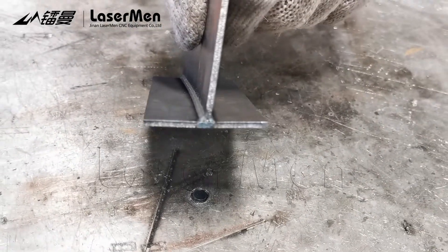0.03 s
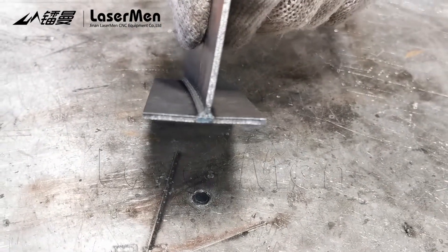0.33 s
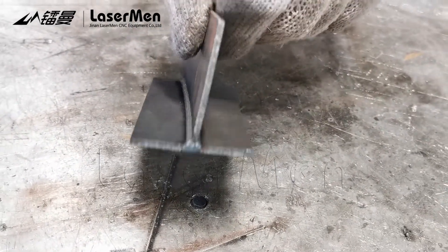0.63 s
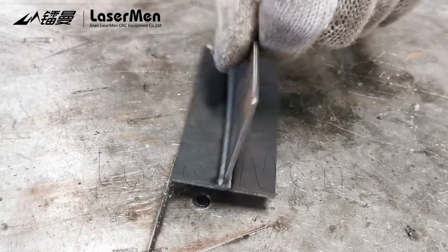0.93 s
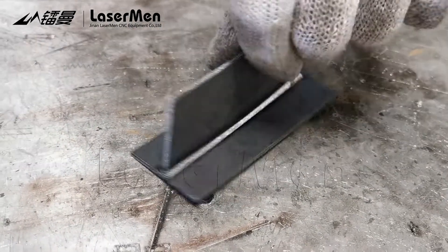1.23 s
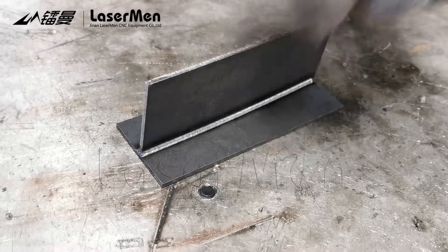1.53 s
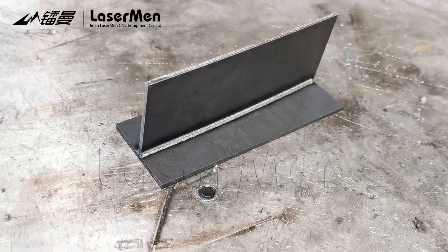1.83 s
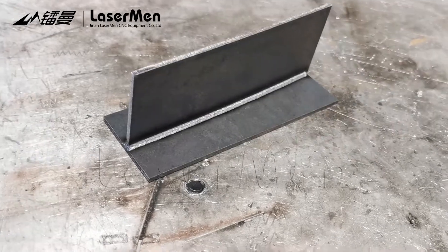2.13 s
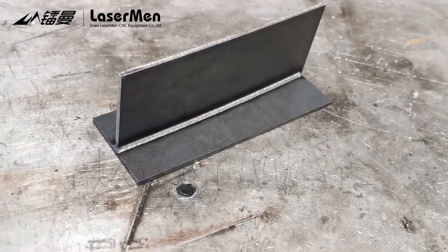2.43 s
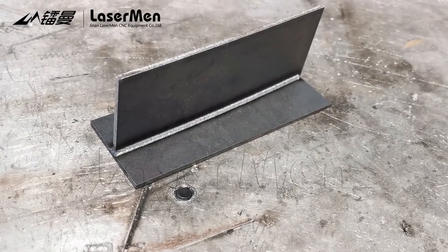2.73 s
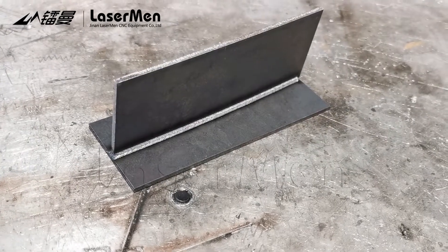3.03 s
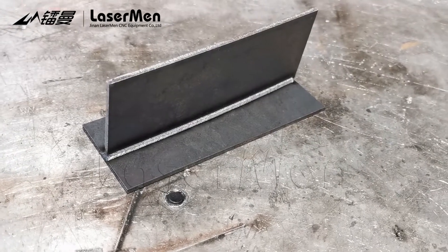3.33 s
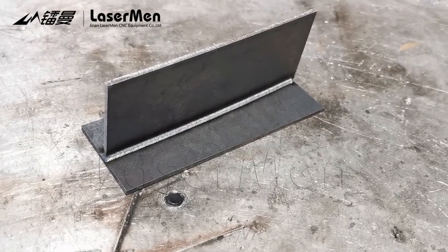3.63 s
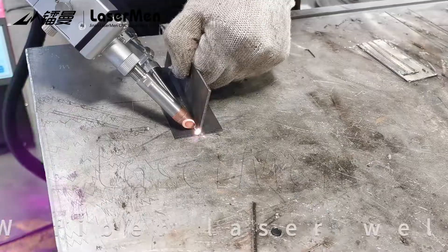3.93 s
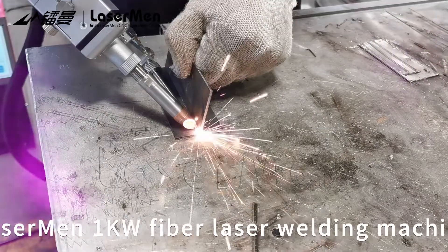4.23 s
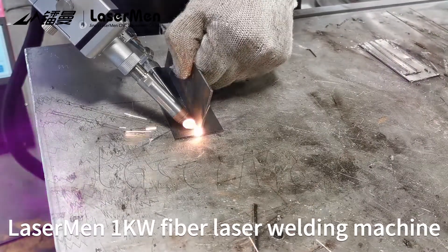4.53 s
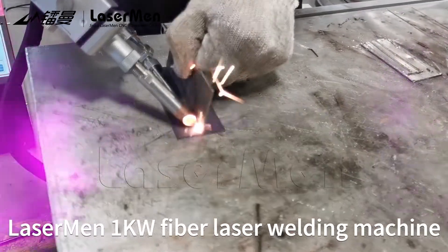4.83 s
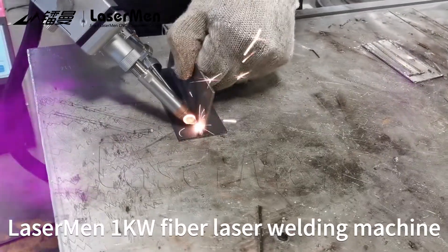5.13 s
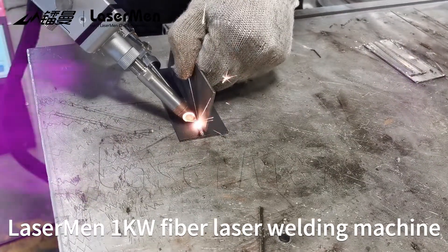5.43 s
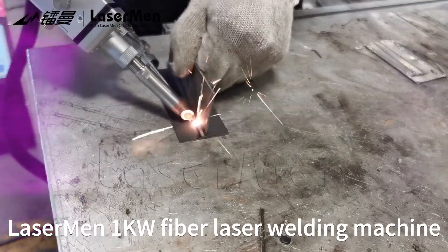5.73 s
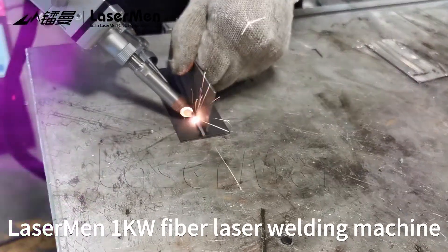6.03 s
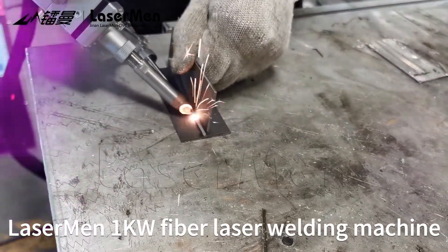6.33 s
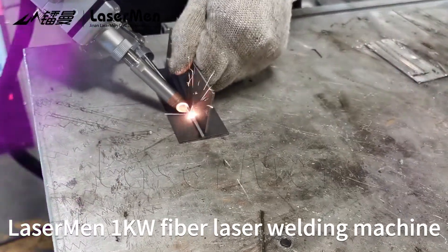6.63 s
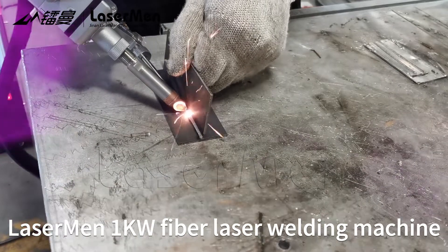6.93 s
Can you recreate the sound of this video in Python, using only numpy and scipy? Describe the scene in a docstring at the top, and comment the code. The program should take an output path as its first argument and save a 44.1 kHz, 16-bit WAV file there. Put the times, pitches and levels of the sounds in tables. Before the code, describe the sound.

In a workshop, over the steady hum of fans and pumps, a steel piece is set down on a metal table with light knocks and a bright scrape. A short clink comes just before a moment of silence. Then a handheld laser welding gun starts with a puff of gas and settles into a close, bright, rapidly pulsing sizzle, mostly on the left, with popping droplets and growing sputter over a low machine hum.

```python
"""Laser welding in a workshop

Fans drone while a steel T-piece is turned and set down on a steel table: its edges ring and skid, the
table top clacks, and a loose part clinks. After a short silence a handheld laser gun starts. Shield gas
rushes from the nozzle, then the melt pool sizzles close on the left, spitting sparks and fluttering
as the beam sweeps from side to side across the seam."""
import sys
import numpy as np
from scipy import signal
from scipy.fft import rfft, irfft
from scipy.io import wavfile
from scipy.ndimage import uniform_filter1d

SR = 44100
rng = np.random.default_rng(int(sys.argv[2]) if len(sys.argv) > 2 else 0)


def wrap_up_sound(samples):
    """Save the sound to the file named by the first command line argument, as 16-bit audio."""
    columns = np.atleast_2d(samples).T
    # keep every value between -1 and 1, then stretch to whole-number steps
    tamed = np.clip(columns, -1, 1)
    steps = np.round(tamed * 32767).astype(np.int16)
    wavfile.write(sys.argv[1], SR, steps)


N = 308700
T = np.arange(N) / SR
FREQS = np.maximum(np.arange(N // 2 + 1) * SR / N, 1)

# bed of workshop fan noise: f/Hz, left level/dB, right level/dB
FAN_SPECTRUM = [(25, -88, -80.5), (50, -76, -68), (115, -72.5, -68), (209.5, -65, -60), (303, -72.5, -66),
                (446, -81, -78), (680, -79.5, -75), (860, -79, -74.5), (1530, -86.5, -79.5),
                (3355, -90.5, -73), (4360, -91, -89.5), (6750, -101, -88.5), (8460, -101, -100),
                (15460, -106, -117)]
# fan and pump tones: f/Hz, level/dB
FAN_TONES = [(113, -52), (178, -58), (199, -54), (224, -56.5), (301.5, -55), (341, -56), (663, -62.5),
             (690, -65.5), (769, -69.5), (905, -66), (922, -63), (1012, -67), (1092, -73.5), (1249, -66.5),
             (1376, -69.5), (1615, -75.5), (3085, -69), (3511, -64.5), (3698, -67.5), (3747, -69),
             (3795, -70.5)]
# partials of a motor whine: f/Hz, level/dB
MOTOR_WHINE = [(948, -55), (958.5, -57.5), (996, -60)]
# machine noise at the welding bench: f/Hz, left level/dB, right level/dB
MACHINE_SPECTRUM = [(25, -92, -99), (60, -80, -95), (121, -76.5, -86.5), (267, -78, -83.5),
                    (332, -83, -90.5), (446, -85.5, -101.5), (790, -86.5, -94), (990, -92.5, -99),
                    (1190, -87.5, -98.5), (1680, -93.5, -99.5), (2900, -91, -97)]
# hum of that machine: f/Hz, level/dB
MACHINE_TONES = [(221, -71.5), (904, -78.5), (953, -71), (1001, -74)]

# modes of the T-piece: f/Hz, level/dB, t60/s
PIECE_MODES = [(5640, -7, .17), (5820, 1, 0.14), (5980, -8, .14), (6400, -8.5, .26), (6540, -11, .2),
               (7650, -11.5, 0.224), (7800, -16, .1), (8400, -12.5, .14), (10580, -10, .16),
               (10900, -9.5, .17), (14120, -14.5, .16)]
# modes of the table top: f/Hz, level/dB, t60/s
TABLE_MODES = [(230, -12, 0.12), (318, -10, 0.19), (590, -5, 0.16), (723, -8, .08), (850, -1.5, 0.14),
               (962, -11, 0.18), (1059, -1, 0.11), (1140, -7, .05), (1460, -13, .06), (1740, -17, .08),
               (1860, -0.5, 0.092), (2060, -5.5, .05), (2280, -7, 0.055), (2810, -7, 0.083)]
# modes of a loose steel part: f/Hz, level/dB, t60/s
LOOSE_MODES = [(2830, -2.5, 0.017), (3170, -8, 0.026), (3440, -2, 0.043), (3700, -10, 0.069),
               (5300, -8, 0.027), (5100, -4, 0.027), (6980, -9.5, 0.036), (7640, -11, .03),
               (8890, -19, 0.034)]
# an edge of the piece grazes the table: t/s, ring level/dB, skid level/dB
EDGE_TOUCHES = [(1.1486, -52, -45), (1.168, -51, -46), (1.24, -54, -49), (1.319, -53, -46),
                (1.346, -53, -40), (1.377, -53, -37), (1.403, -45, -19.5)]
# a corner catches: t/s, level/dB, f/Hz
CORNER_TICKS = [(1.1486, -27.5, 6950), (1.163, -34, 6900)]
# the piece knocks on the table, corner first, flat at last: t/s, ring level/dB, clack level/dB, f/Hz
TABLE_KNOCKS = [(1.1486, -48, -41, 2200), (1.170, -47, -27, 2700), (1.4228, -38.5, -28, 1200)]
# the loose part clinks: t/s, ring level/dB, scrape level/dB
LOOSE_CLINKS = [(3.702, -32.5, -35), (3.708, -33, -37), (3.716, -33.5, -33.5), (3.718, -37.5, -36.5)]

# resonances of the gas jet in nozzle and joint: f/Hz, nominal width/Hz, left level/dB, right level/dB
JET_RESONANCES = [(957, 130, -75, -71.5), (2150, 196, -68.5, -69), (3500, 700, -78.5, -74),
                  (5290, 520, -67, -75), (6820, 250, -66, -69), (8330, 620, -73, -85),
                  (11100, 1100, -77, -91), (13000, 900, -73.5, -94), (14300, 600, -69, -101)]
# hollow body of the first rush of gas: f/Hz, nominal width/Hz, level/dB
PUFF_RESONANCES = [(170, 146, -67.5), (357, 88, -65.5)]
# droplets burst out of the pool: t/s, level/dB, f/Hz
SPATTER_POPS = [(4.26, -32, 3000), (4.666, -46, 2350), (4.794, -43, 2310), (5.106, -32, 3000),
                (5.398, -42, 2930), (5.997, -39, 2500), (6.008, -34.5, 1800), (6.043, -42, 2000),
                (6.797, -38, 2300), (6.89, -38, 2500), (6.958, -34, 2500), (6.983, -29, 7000)]
# colour of the sizzle on the near, left side: f/Hz, level/dB
NEAR_SIZZLE = [(1500, -102), (2400, -92), (3500, -84), (4500, -80.5), (5200, -79), (5700, -81.5),
               (6400, -78.5), (8000, -77.5), (9400, -68), (10700, -67), (12400, -74.5), (13100, -67),
               (14500, -68.5), (15700, -73)]
# colour of the sizzle on the far, right side: f/Hz, level/dB
FAR_SIZZLE = [(2900, -105), (3850, -88), (5000, -89), (6000, -99), (6750, -88), (7500, -101), (8100, -90.5),
              (9100, -104), (10100, -105), (10600, -91.5), (12300, -95.5), (15000, -111)]
# reflections in the corner of the joint cancel the sizzle: f/Hz, nominal half width/Hz, gain/dB
JOINT_NOTCHES = [(3990, 186, -17), (7080, 320, -6.5), (8520, 430, -4), (10030, 250, -14.5),
                 (11610, 240, -14), (14200, 150, -3)]
# the plume rings in that corner: f/Hz, nominal width/Hz, level/dB
JOINT_RESONANCES = [(5160, 460, -92), (6730, 420, -72), (8000, 360, -76)]
# vapour spurts from plates and seam on each swing of the beam: position/cycles, width/cycles, level/dB
SWING_SPURTS = [(.19, 0.14, 2), (.435, 0.062, -1.5), (.555, .024, -2.5), (.63, .055, -10),
                (.93, 0.072, 1.5)]

SILENCE_START_S, SILENCE_END_S = 3.736, 3.964
STRIKE_S, DUCK_S = 4.078, 4.1  # the beam strikes; machine and gas duck as the weld takes hold


def undb(db):
    """Decibels to gain."""
    return 10 ** (np.asarray(db) / 20)


def ramp(start_s, length_s):
    """Linear fade from 0 to 1."""
    return np.clip((T - start_s) / length_s, 0, 1)


def after(s):
    """Seconds gone by since time s."""
    return np.maximum(T - s, 0)


def white():
    """White noise of 0 dB per Hz."""
    return rng.standard_normal(N) * np.sqrt(SR / 2)


def walk(rate_hz):
    """Smooth random modulator: stepped levels, slewed twice; spread near 1."""
    hold = max(int(SR / rate_hz), 1)
    steps = np.repeat(rng.standard_normal(N // hold + 1), hold)
    return 1.295 * uniform_filter1d(uniform_filter1d(steps, hold), hold)[:N]


def colours(spectrum):
    """An EQ curve, as gain per frequency, for each level column of a spectrum."""
    hz, *columns = np.transpose(spectrum)
    return np.array([undb(np.interp(np.log(FREQS), np.log(hz), db)) for db in columns])


def resonance(hz, width_hz):
    """Response of one resonance, gain 1 at its centre."""
    return 1 / (1 + 1j * (FREQS / hz - hz / FREQS) * hz / width_hz)


def cavity(resonances):
    """Response of a hollow: steep-sided resonances in parallel."""
    return sum(undb(db) * resonance(hz, width) ** 2 for hz, width, db in resonances)


def shaped(x, response):
    """Filter a sound by a frequency response."""
    return irfft(rfft(x) * response, N)


def bandpass(x, hz, q):
    """Resonant band-pass for short sounds."""
    return signal.lfilter(*signal.iirpeak(hz, q, fs=SR), x)


def add(track, s, sound):
    """Mix a short sound into a track at time s."""
    start = int(s * SR)
    track[start:start + len(sound)] += sound[:N - start]


def panned(x, pan_db):
    """Left and right, pan_db apart; positive leans left."""
    return x * undb(np.array([[pan_db], [-pan_db]]) / 2)


def ring(modes, scatter_db):
    """Struck modes; every contact point weights them a little differently."""
    t = T[:SR // 2]
    chance = rng.standard_normal((len(modes), 2))
    return sum(undb(db + scatter_db * weight - 60 * t / t60) * np.sign(side) * np.sin(2 * np.pi * hz * t)
               for (hz, db, t60), (weight, side) in zip(modes, chance))


def burst(t60):
    """A quickly dying rush of noise."""
    t = T[:SR // 4]
    return rng.standard_normal(len(t)) * undb(-60 * t / t60)


def snap(hz):
    """A sharp crack, spent within about one cycle."""
    t = T[:SR // 100]
    return np.cos(2 * np.pi * hz * t) * np.exp(-np.pi * hz * t)


def turbulence(spectrum, mono_below_hz, flicker_db):
    """Fan air: octave bands flicker on their own; the bass is alike in both ears."""
    shared = 0.95 / (1 + (FREQS / mono_below_hz) ** 2)
    noise = rfft(white()) * np.sqrt(shared) + rfft([white(), white()]) * np.sqrt(1 - shared)
    noise = noise * colours(spectrum)
    octave = np.clip(np.log2(FREQS / 60), 0, 8)
    bands = (irfft(noise * np.maximum(1 - abs(octave - k), 0), N) for k in range(9))
    return sum(band * undb(flicker_db * walk(14)) for band in bands)


def tone(hz, drift_hz, waver_db):
    """A machine tone that wanders in pitch and level; rms near 1."""
    phase = 2 * np.pi * np.cumsum(hz + drift_hz * walk(12)) / SR
    return np.sqrt(2) * np.sin(phase) * undb(waver_db * walk(15))


def workshop_fans():
    """Fans and pumps drone, mostly on the right; a motor whine eases off as a lower one swells."""
    drone = sum(undb(db - 1) * tone(hz, drift_hz=3.01, waver_db=2) for hz, db in FAN_TONES)
    high_whine = sum(undb(db) * tone(hz, drift_hz=3.19, waver_db=1.2) for hz, db in MOTOR_WHINE)
    high_whine *= undb(-3 * after(2))
    low_whine = undb(-65 + 4 * after(1.2)) * tone(865.5, drift_hz=2.99, waver_db=1.5)
    air = turbulence(FAN_SPECTRUM, mono_below_hz=800, flicker_db=0.5)
    return air + panned(drone + high_whine + low_whine, pan_db=-11.5)


def bench_machine():
    """Dull air and hum at the welding bench: ducks as the weld takes hold, then creeps back."""
    hum = sum(undb(db - 2.5) * tone(hz, drift_hz=3.42, waver_db=4.5) for hz, db in MACHINE_TONES)
    air = turbulence(MACHINE_SPECTRUM, mono_below_hz=850, flicker_db=1.5)
    lowpass = 1 / (1 + (FREQS / 3600) ** 10)
    level_db = 10.5 - 12.5 * ramp(DUCK_S, 0.11) + 1.5 * after(DUCK_S)
    lean_db = np.outer([0, .4], np.maximum(level_db + 5, 0))  # the louder, the more on the right
    return shaped(air + panned(hum, pan_db=16), lowpass) * undb(level_db + lean_db)


def skid(t60, grit_db):
    """A skidding edge rubs gritty noise through the modes of the piece."""
    rub = burst(t60) * undb(grit_db * walk(900)[:SR // 4])
    return sum(undb(db) * bandpass(bandpass(rub, hz, q=26), hz, q=26) for hz, db, _ in PIECE_MODES)


def edge_touches():
    """The piece rings, skids and squeaks at each touch, until the last knock lays it flat and mutes it."""
    track = np.zeros(N)
    attack = ramp(0, .001)
    for s, ring_db, skid_db in EDGE_TOUCHES:
        add(track, s, undb(ring_db) * ring(PIECE_MODES, scatter_db=1) * attack[:SR // 2])
        add(track, s, undb(skid_db) * skid(t60=.052, grit_db=2.8) * attack[:SR // 4])
        add(track, s, undb(skid_db - 11) * bandpass(burst(t60=.055), 14200, q=18))  # thin squeak
    flat_s = TABLE_KNOCKS[-1][0]
    return track * undb(-60 * after(flat_s) / .01)


def corner_ticks(rise_s=.0008):
    """A corner catches: an edge resonance swells and dies within milliseconds, with a noisy tail."""
    track = np.zeros(N)
    t = T[:SR // 20]
    envelope = (t / rise_s * np.exp(1 - t / rise_s)) ** 2
    for s, db, hz in CORNER_TICKS:
        add(track, s, undb(db) * np.sin(2 * np.pi * hz * t) * envelope)
        band = signal.butter(2, [hz - 600, hz + 600], "band", fs=SR, output="sos")
        add(track, s, undb(db - 2.5) * signal.sosfilt(band, burst(t60=.055)))
    return track


def table_knocks():
    """The table top rings; its many small modes blur into a dry clack, lower for a flatter blow."""
    track = np.zeros(N)
    mids = signal.butter(5, [200, 3150], "band", fs=SR, output="sos")
    for s, ring_db, clack_db, hz in TABLE_KNOCKS:
        add(track, s, undb(ring_db) * ring(TABLE_MODES, scatter_db=1.9))
        clack = bandpass(burst(t60=.065), hz, q=.9)
        thud = undb(3) * bandpass(burst(t60=.1), 560, q=1)
        add(track, s, undb(clack_db) * signal.sosfilt(mids, clack + thud))
        add(track, s, undb(clack_db - 1.5) * snap(hz))
    return track


def loose_clinks():
    """A loose steel part clinks: short, bright rings, each with a scrape."""
    track = np.zeros(N)
    for s, ring_db, scrape_db in LOOSE_CLINKS:
        add(track, s, undb(ring_db) * ring(LOOSE_MODES, scatter_db=3.5))
        add(track, s, undb(scrape_db + 1.5) * bandpass(burst(t60=.029), 4500, q=.5))
    return track


def steel_handling():
    """All the steel contacts, placed on the right in a short, midrange room reverb."""
    direct = edge_touches() + corner_ticks() + table_knocks() + loose_clinks()
    echoes = np.array([burst(t60=0.31) for _ in range(2)])
    room = signal.fftconvolve(direct[None], echoes / np.linalg.norm(echoes[0]))[:, :N]
    return panned(direct + undb(-9) * shaped(room, resonance(1500, 3000)), pan_db=-11)


def shield_gas():
    """The jet sounds its resonances, then settles lower; a soft thump and a hollow puff open it."""
    power = sum(abs(undb([[left], [right]]) * resonance(hz, 1.4 * width) ** 2) ** 2
                for hz, width, left, right in JET_RESONANCES)
    jet = shaped(np.array([white(), white()]), np.sqrt(power))
    jet_db = -1.5 - 13.5 * (1 - np.exp(-after(DUCK_S) / 0.045))
    age = after(SILENCE_END_S)
    thump = -undb(-25.5) * (np.exp(-age / 0.045) - np.exp(-age / 0.00069))
    puff_envelope = ramp(SILENCE_END_S, .05) * undb(-130 * after(4.087))
    puff = shaped(white(), cavity(PUFF_RESONANCES)) * puff_envelope
    return jet * undb(jet_db) + thump + panned(puff, pan_db=-4)


def crackle(per_s, scatter_db):
    """Random clicks of uneven size while the pool burns."""
    return (rng.random(N) < per_s / SR) * (T > STRIKE_S) * undb(scatter_db * rng.standard_normal(N))


def spatter():
    """Droplets pop out of the pool, fine sparks crackle, and a lower sputter builds as the seam heats."""
    pops = np.zeros(N)
    for s, db, hz in SPATTER_POPS:
        add(pops, s, undb(db) * snap(hz))
    sparks = shaped(undb(-33.5) * crackle(per_s=39, scatter_db=3.5), resonance(6000, 10000))
    sputter = undb(-34) * crackle(per_s=600, scatter_db=3) * ramp(4.8, 2.1)
    return panned(pops + sparks + shaped(sputter, resonance(2700, 5400) ** 2), pan_db=13)


def beam_sweep_db(sweep_hz=43.7, scatter_db=1, floor_db=-8.5):
    """Flutter of the pool: the same spurts come round on every swing, never quite equally strong."""
    power = undb(floor_db) ** 2
    for position, width, db in SWING_SPURTS:
        offset = (sweep_hz * T - position + .5) % 1 - .5
        power += undb(db + scatter_db * walk(sweep_hz)) ** 2 * np.exp(-(offset / width) ** 2)
    return 10 * np.log10(power)


def cancelled(notches):
    """Gain per frequency left where a reflection cancels the direct sound."""
    return undb(sum(db / (1 + ((FREQS - hz) / width) ** 2) ** 1.45 for hz, width, db in notches))


def melt_pool():
    """Metal vapour hisses out of the pool, in throbs once the sweeping beam runs off the seam."""
    age = after(STRIKE_S)
    falter_db = -4 * np.exp(-((T - 4.2) / 0.012) ** 2)
    burning = ramp(STRIKE_S, 0.055) * undb(falter_db)
    # early on the beam bites fully into the seam: louder, with hardly any throb
    bite = ramp(4.19, .05) - ramp(4.585, 0.25)
    envelope = burning * undb(1 + 1.1 * bite + 0.5 * walk(6))
    throb_db = (1 - 0.92 * bite) * beam_sweep_db()
    throb = envelope * undb(throb_db)
    boiling = undb(1.2 * walk(500) + 0.5 * walk(30))  # the vapour channel opens and closes
    # the treble follows the sweep; the lower hiss of the plume is steadier
    plume_db = 1 + 2.5 * bite + 0.05 * age + 0.22 * throb_db
    plume = white() * burning * undb(plume_db + 0.6 * walk(26))
    low_share = 1 / (1 + (FREQS / 6500) ** 4)
    treble = shaped(white() * throb * boiling, np.sqrt(1 - low_share))
    vapour = treble + shaped(plume, np.sqrt(low_share))
    joint_ring = shaped(plume * undb(-8 * age), cavity(JOINT_RESONANCES))  # fades as the nozzle travels
    buzz = undb(-54) * shaped(throb, resonance(85, 170))  # the pulsing outflow pushes air
    left = shaped(vapour, cancelled(JOINT_NOTCHES) * colours(NEAR_SIZZLE)[0]) + joint_ring + buzz
    # the hiss spills to the right later and partly by way of the room, most during the bite
    spill = .76 * np.roll(vapour, 16) + .65 * white() * envelope
    spill_db = 3.5 + 2 * bite - 2.5 * age
    right = shaped(spill, cancelled(JOINT_NOTCHES[:1]) * colours(FAR_SIZZLE)[0]) * undb(spill_db)
    return np.array([left, right])


def scene():
    """Steel is set down in the workshop; a short silence; then the weld."""
    setting_down = workshop_fans() + steel_handling()
    welding = bench_machine() + shield_gas() + melt_pool() + spatter()
    return setting_down * (T < SILENCE_START_S) + welding * (T >= SILENCE_END_S)


def record(dry):
    """A steep high cut at 15660 Hz on the whole mix."""
    return signal.sosfilt(signal.ellip(10, .2, 70, 15660, fs=SR, output="sos"), dry)


dry = scene()
out = record(dry)
wrap_up_sound(out)
```